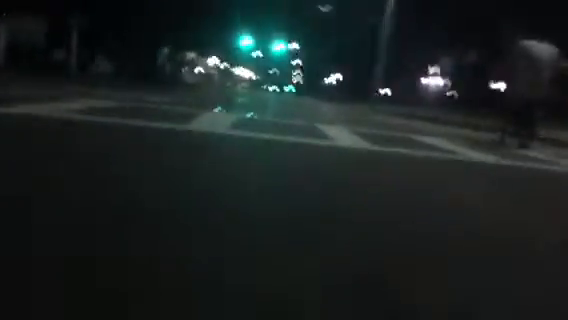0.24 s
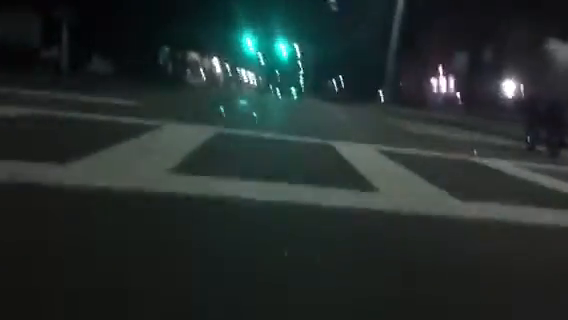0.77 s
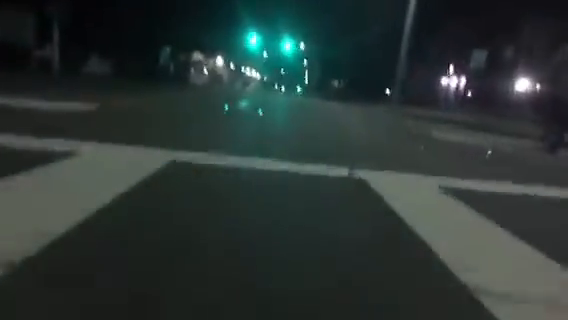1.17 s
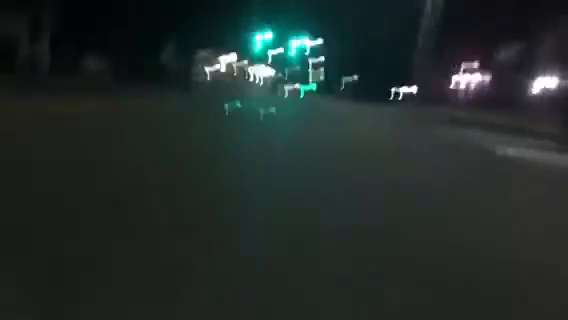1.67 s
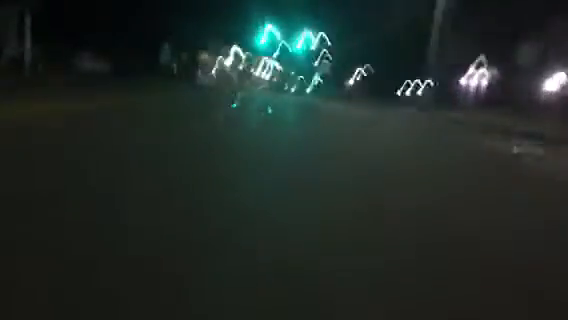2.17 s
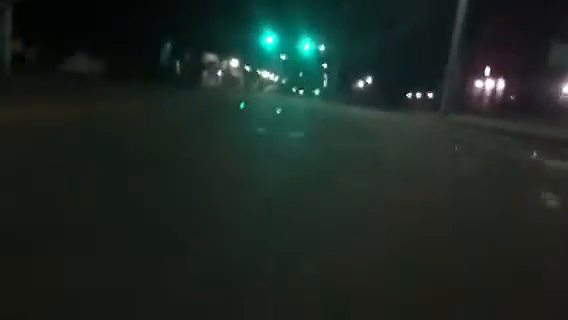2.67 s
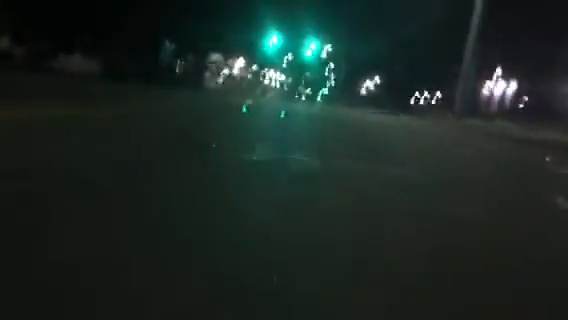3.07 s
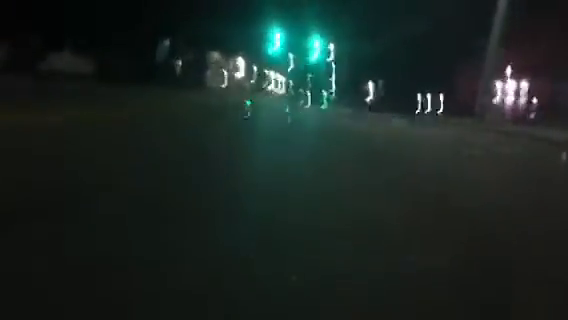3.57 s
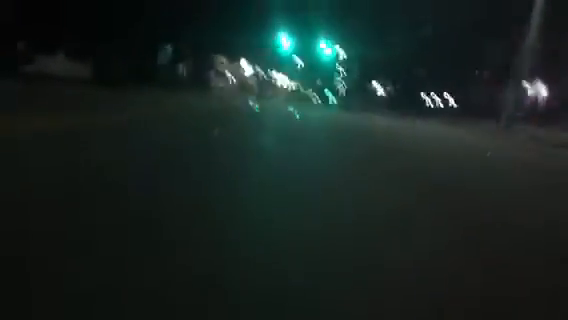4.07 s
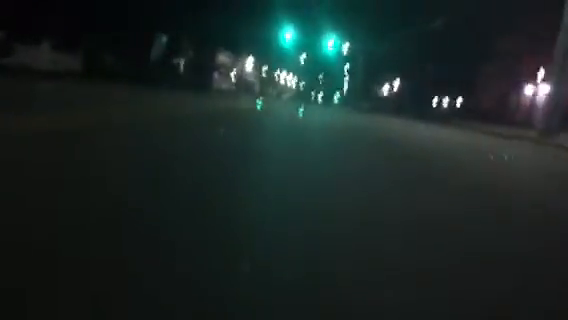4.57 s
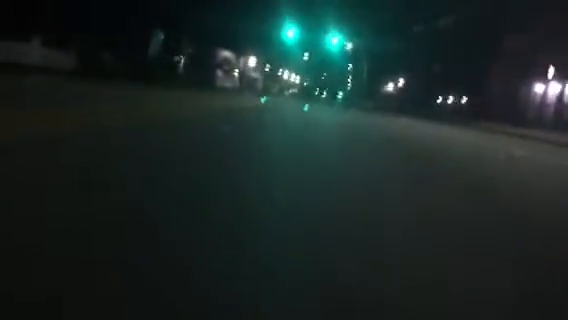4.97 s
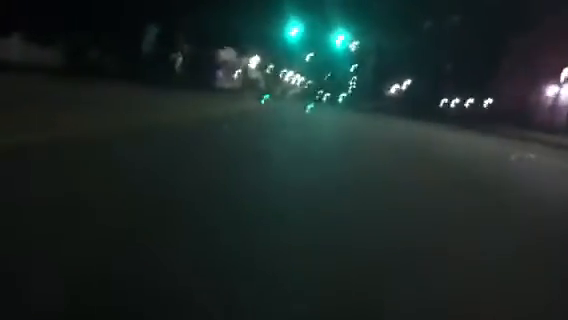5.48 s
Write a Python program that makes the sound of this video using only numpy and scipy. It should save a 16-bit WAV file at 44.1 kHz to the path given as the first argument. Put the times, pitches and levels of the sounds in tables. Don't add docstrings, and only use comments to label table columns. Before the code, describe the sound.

A powered wheelchair speeds along a night road, motor humming over low rumble while bumps thud and loose parts clack hard around two seconds.

```python
import sys
import numpy as np
from scipy import signal
from scipy.fft import rfft, irfft
from scipy.io import wavfile
from scipy.ndimage import uniform_filter1d

SR = 44100
rng = np.random.default_rng(int(sys.argv[2]) if len(sys.argv) > 2 else 0)


def undo_db(level):
    steps = np.asarray(level, float) / 20
    return 10 ** steps


def to_wav(sig):
    pcm = np.clip(np.atleast_2d(sig), -1, 1) * 32767
    pcm = np.round(pcm).astype(np.int16)
    wavfile.write(sys.argv[1], SR, pcm.T)


N = 253134

# time in seconds, level in dB against the average.
ROAD = [(0, -0.5), (.6, -1), (1.0, -2), (1.4, 2.5), (1.55, 2), (1.63, 4.5), (1.72, 5), (1.82, 1.5),
        (2.08, -5.5), (2.17, 6.5), (2.24, -0.5), (2.33, -8), (2.45, -6), (3.05, -4.5), (3.6, -1), (4.2, -1),
        (4.5, -1.5), (5.74, 0)]


def evened(x):
    return x / np.sqrt(np.mean(x ** 2) + 1e-20)


def peaked(x):
    return x / np.sqrt(uniform_filter1d(x ** 2, size=66).max())


def read(points, hz):
    f, value = np.transpose(points)
    return np.interp(np.log(hz + 1), np.log(f + 1), value)


def curve(rows, order):
    columns = np.transpose(rows)
    return np.interp(np.arange(N) / SR, columns[0], columns[order])


def add(mix, s, sound):
    part = mix[round(s * SR):][:len(sound)]
    part += sound[:len(part)]


def drift(hz):
    f = np.fft.rfftfreq(N, 1 / SR)
    return evened(irfft(rfft(rng.standard_normal(N)) / (1 + (f / hz) ** 2), N))


def causal(db):
    log_gain = np.log(undo_db(np.maximum(np.r_[db, db[-2:0:-1]], -100)))
    taps = np.fft.ifft(np.exp(np.conj(signal.hilbert(log_gain)))).real[:2048]
    return taps / np.linalg.norm(taps)


def coloured(x, points):
    response = causal(read(points, np.fft.rfftfreq(4096, 1 / SR)))
    return signal.oaconvolve(x, response)[:len(x)]


def modes(x, table):
    out = 0
    for hz, width, db in table:
        r = np.exp(-np.pi * width / SR)
        pole = r * np.exp(2j * np.pi * hz / SR)
        ring = signal.lfilter([(1 - r) ** 2], [1, -2 * pole, pole ** 2], x).real
        out = out + undo_db(db) * 2 * ring / np.sqrt(width)
    return out


def motor():
    # time in seconds, level in dB.
    hum_points = [(0, -25), (.95, -27.5), (1.15, -32), (1.5, -26.5), (2.2, -49), (2.4, -30.5), (3, -26.5),
                  (3.5, -26.5), (3.65, -32.5), (4.25, -27), (4.4, -26), (4.9, -21.5), (5.4, -23.5), (5.47, -34.5),
                  (5.56, -24), (5.74, -19)]
    hum_hz, mesh_ratio = 205.9, 5 / 3
    turns = np.cumsum(hum_hz * (1 + 0.004 * drift(hz=6.7))) / SR
    hum_level = np.sqrt(2) * undo_db(curve(hum_points, order=1) + 2.5 * drift(hz=21))
    hum = hum_level * np.sin(2 * np.pi * turns + 0.57 * drift(hz=14))
    mesh_level = undo_db(-2.5 + 1.5 * drift(hz=9.4))
    mesh = mesh_level * np.sin(2 * np.pi * mesh_ratio * turns + 0.27 * drift(hz=9.9))
    return hum, mesh


def frame_level():
    # centre in seconds, level in dB, half length in seconds.
    swell_rows = [(0.11, -22, 0.096), (0.5, -23, 0.22), (0.716, -21, 0.02), (0.834, -22.5, 0.015),
                  (1.122, -21, 0.24), (1.316, -20, 0.022), (1.485, -25.5, 0.039), (1.696, -28.5, 0.11),
                  (1.7, -35, 0.014), (1.857, -30, 0.57), (2.18, -11.5, 0.0068), (2.518, -25, 0.09),
                  (2.736, -24.5, 0.042), (2.807, -15.5, 0.017), (2.977, -21, 0.097), (3.158, -20.5, 0.031),
                  (3.238, -26, 0.094), (3.412, -18, 0.0057), (3.565, -20, 0.14), (3.782, -17.5, 0.014),
                  (3.915, -24, 0.18), (3.943, -24.5, 0.012), (4.355, -20.5, 0.2), (4.913, -20, 0.011),
                  (4.931, -25, 0.34), (5.149, -18, 0.027), (5.273, -22, 0.033), (5.384, -20.5, 0.027),
                  (5.605, -20, 0.025), (5.789, -21.5, 0.28)]
    t = np.arange(0, N, 64) / SR
    swells = sum(undo_db(db) * np.exp(-((t - s) / half) ** 2) for s, db, half in swell_rows)
    resting = undo_db(-30.5 + 0.47 * curve(ROAD, order=1))
    return resting + np.interp(np.arange(N) / SR, t, swells)


def frame_ringing(mesh):
    # pitch in Hz, width in Hz, level in dB.
    frame_modes = [(344.1, 13.9, 2.5), (371.64, 27.2, 0.5), (389.4, 41.4, -10)]
    ringing = mesh + evened(modes(rng.standard_normal(N), frame_modes))
    slow = np.sqrt(uniform_filter1d(ringing ** 2, size=4000) + 0.11)
    return frame_level() * evened(ringing / slow)


def shaking(bumps):
    return evened(uniform_filter1d(abs(bumps), size=2500))


def rumble(bumps):
    # frequency in Hz, density in dB per Hz.
    low_colour = [(8.8, -44), (15, -17.5), (48, 0.5), (155, -1.5), (199, -3), (225, -6.5), (272, -10.5),
                  (348, -15), (401, -5), (487, -28.5), (1000, -51), (1300, -79.5), (2200, -120)]
    hz = np.fft.rfftfreq(N, 1 / SR)
    lumpy = rng.standard_normal(N) * undo_db(2.0 * drift(hz=30))
    low = irfft(rfft(lumpy) * undo_db(read(low_colour, hz)), N)
    return undo_db(-24.5 + 0.91 * curve(ROAD, order=1) + 1.8 * shaking(bumps)) * evened(low)


def rattle(bumps):
    # pitch in Hz, width in Hz, level in dB.
    ridges = [(1640, 140, -10), (3660, 610, -3), (4540, 580, 1), (5840, 760, -11), (9450, 1200, -9.5)]
    # frequency in Hz, density in dB per Hz.
    housing = [(260, -29), (450, -8), (492, -9.5), (626, -9.5), (983, -25), (1250, -22), (1570, -22),
               (2210, -28.5), (4490, -39.5), (5060, -43.5), (5890, -37), (7710, -45.5), (9380, -45.5),
               (15200, -66.5), (16400, -77.5)]
    sound = rng.standard_normal(N) * undo_db(1.5 * drift(hz=40))
    grain = undo_db(-60 * np.arange(1200) / SR / .023)
    busy = .9 + .6 * evened(uniform_filter1d(abs(bumps), size=600))
    for hz in (700, 1500, 3300, 4500, 6000, 9000):
        strength = undo_db(5.7 * np.minimum(rng.exponential(1, N), 2.4))
        hits = strength * (rng.random(N) < 70 * busy / SR)
        grains = signal.oaconvolve(hits, grain)[:N] * rng.standard_normal(N)
        sound = sound + 0.92 * np.sqrt(hz / SR) * evened(modes(grains, [(hz, 0.7 * hz, 0)]))
    sound = sound + 0.22 * evened(modes(sound, ridges))
    level = undo_db(-44.5 + 0.66 * curve(ROAD, order=1) + shaking(bumps))
    return level * evened(coloured(sound, housing))


def jolt(hz, length, phase, tail):
    t = np.arange(SR // 5) / SR - .05
    shape = np.where(t < 0, np.exp(-(t / (.5 * length)) ** 2), 1 / np.cosh(t / (tail * length)))
    return shape * np.cos(2 * np.pi * (hz * t + phase))


def thuds():
    # deepest swing in seconds, peak in dB, pitch in Hz, length in seconds,
    # direction (1 kicked up, -1 dropped).
    large = [(0.143, -6, 151.3, 0.014, -1), (0.363, -5, 102.7, 0.014, -1), (0.495, -10.5, 106, 0.03, -1),
             (0.612, -6, 116, 0.022, -1), (0.729, -8.5, 88, 0.018, -1), (0.823, -10, 103.2, 0.015, 1),
             (0.845, -7.5, 108.4, 0.013, -1), (0.937, -12.5, 80.6, 0.05, -1), (1.299, -8.5, 117, 0.01, -1),
             (1.399, -7.5, 114.7, 0.01, 1), (1.525, -11, 86.5, 0.012, -1), (1.569, -4, 100.3, 0.017, 1),
             (1.63, -8, 130.3, 0.022, -1), (1.665, -4, 69.6, 0.022, 1), (1.71, -6, 100, 0.016, 1),
             (1.811, -1.5, 104.7, 0.018, 1), (2.015, -6.5, 99.6, 0.02, -1), (2.048, -5, 114.4, 0.011, -1),
             (2.151, -3.5, 94.6, 0.018, 1), (2.184, -5, 89.3, 0.016, 1), (2.408, -14, 55.2, 0.051, 1),
             (3.049, -6, 117, 0.012, -1), (3.623, -5.5, 87.7, 0.015, -1), (3.681, -7.5, 105, 0.014, -1),
             (3.712, -7, 125.7, 0.01, 1), (3.791, -4.5, 99.5, 0.014, 1), (3.873, -7, 83.7, 0.02, -1),
             (4.187, -3.5, 121.5, 0.013, 1), (4.269, -2.5, 111.3, 0.013, 1)]
    # time in seconds, peak in dB, direction.
    small = [(0.035, -18.5, -1), (0.217, -12, 1), (1.262, -11, 1), (1.439, -11.5, -1), (1.464, -11, -1),
             (1.734, -11.5, 1), (1.843, -15, -1), (2.275, -13, 1), (3.323, -13.5, -1), (3.406, -10, -1),
             (3.554, -12.5, -1), (4.024, -8.5, -1), (4.054, -12, -1), (4.225, -9.5, -1), (4.452, -11.5, -1),
             (4.923, -12.5, -1), (5.277, -13, 1), (5.387, -13.5, -1), (5.509, -12.5, 1)]
    # time in seconds, peak in dB, pitch
    # in Hz, direction.
    more_bumps = [(0.401, -13, 110.3, -1), (0.528, -15.5, 110.6, -1), (0.802, -10, 79.9, 1),
                  (0.951, -13.5, 100.7, -1), (1.1, -14.5, 111, 1), (1.32, -12, 99, 1), (1.558, -7, 110, 1),
                  (1.584, -8.5, 110.3, 1), (1.601, -6.5, 89.2, -1), (1.7, -11, 110, 1),
                  (1.756, -14.5, 100.2, -1), (1.802, -3.5, 94.6, -1), (2.004, -6, 94.4, -1),
                  (2.064, -10.5, 89.4, 1), (2.146, -9, 99.7, -1), (2.2, -10.5, 110.7, 1),
                  (2.39, -16.5, 80.6, 1), (3.285, -15, 110.2, -1), (3.768, -12.5, 100.2, -1),
                  (4.154, -14, 110.6, 1), (4.239, -10.5, 109.5, -1), (4.386, -12, 79.2, 1),
                  (4.619, -19, 80.4, 1), (4.816, -17, 100.8, -1), (5.04, -14.5, 100, -1),
                  (5.153, -14.5, 100, 1)]
    out = np.zeros(N)
    rows = large + [(s, db, 117, 0.011, way) for s, db, way in small]
    for (s, db, hz, length, way), (u, v) in zip(rows, rng.random((len(rows), 2))):
        swing = jolt(hz, length, 0.075 * (u - .5), tail=0.23)
        swing = swing + .5 * jolt(1.93 * hz, 0.49 * length, .2 * (v - .5), tail=0.52)
        cut = round(max(.05 - s, 0) * SR)
        add(out, max(s - .05, 0), np.sign(way) * undo_db(db - 2.5) * swing[cut:])
    for s, db, hz, way in more_bumps:
        add(out, s - .05, np.sign(way) * undo_db(db) * jolt(hz, 0.015, 0, tail=.3))
    return out


def ticks():
    # time in seconds, body in dB, bright part in dB, body pitch in Hz.
    clacks = [(0.4685, -40, -44, 1580), (0.59, -42, -44, 1640), (0.7947, -29, -52.5, 1270),
              (0.927, -42, -46, 1740), (1.3894, -33.5, -55, 1240), (1.493, -35, -39, 1550),
              (1.557, -31, -53, 1320), (1.5963, -43, -45, 1100), (1.607, -37, -40, 1156),
              (1.637, -43, -43, 3000), (1.6581, -25.5, -37, 1220), (1.67, -58, -36, 3710),
              (1.7868, -23.5, -40.5, 2150), (1.802, -31.5, -38, 1500), (1.9988, -38.5, -55, 1880),
              (2.055, -39.5, -46, 1530), (2.1416, -28, -35, 1500), (2.14, -28, -34, 1300),
              (2.148, -30, -24, 1680), (2.1645, -18, -43, 1300), (2.175, -24, -21.5, 1500),
              (2.18, -27.5, -25.5, 1563), (2.1869, -17.5, -21.5, 1660), (2.196, -16.5, -26, 1238),
              (2.254, -36, -50, 1700), (3.3922, -36.5, -45, 4070), (3.699, -37.5, -61, 1230),
              (4.231, -46, -44, 1590), (4.2505, -32.5, -45, 2100), (4.254, -39, -37, 3240)]
    # time in seconds, body in dB, bright part in dB, body pitch in Hz.
    scrapes = [(0.135, -43, -47, 1280), (0.198, -54, -45.5, 1560), (0.3589, -46.5, -58, 2150),
               (0.504, -45, -57, 1970), (0.6033, -41, -64, 1220), (0.784, -49, -46, 2860),
               (0.8244, -40.5, -54, 2010), (0.962, -41, -51.5, 1520), (1.3, -38.5, -58, 1860),
               (1.4718, -37.5, -41.5, 1890), (1.573, -42, -36, 2950), (1.6465, -41, -39, 2940),
               (1.6855, -57, -43, 1670), (1.707, -49, -42.5, 1250), (1.7614, -39.5, -51, 3880),
               (1.8506, -39.5, -41, 3800), (2.118, -30, -58, 1790), (2.209, -48, -46, 1100),
               (2.224, -39, -39, 1680), (2.6, -41, -42, 1620), (3.0364, -48, -68, 1360),
               (3.306, -40.5, -43.5, 1860), (3.619, -49, -51, 1450), (3.771, -32.5, -51, 1135),
               (3.86, -41, -50, 1220), (4.171, -40, -49, 1290), (4.255, -38, -39.5, 1720),
               (4.337, -43, -44.5, 1170), (4.602, -43.5, -48, 1710), (4.682, -44, -48.5, 1600)]
    # time in seconds, body in dB, body pitch in Hz.
    grit = [(0.1084, -38, 1290), (0.181, -37, 1470), (0.2457, -36, 1620), (0.559, -38, 1710),
            (0.7048, -40, 1570), (1.048, -41.5, 1700), (1.068, -42, 1300), (1.8935, -38, 1210),
            (1.94, -38, 1960), (1.9874, -40, 1370), (2.0827, -35, 1560), (2.3855, -41, 1200),
            (2.6579, -51, 1570), (2.6828, -46, 1620), (2.796, -38.5, 1420), (2.8373, -42, 1580),
            (3.1548, -36.5, 1250), (3.249, -37, 1230), (3.4046, -36, 1540), (4.1294, -44, 1200),
            (4.145, -38, 1500), (4.3044, -39, 1400), (4.4009, -40, 1620), (4.439, -44.5, 1600),
            (4.861, -36, 1215), (5.256, -35, 1220)]
    # frequency in Hz, density in dB per Hz.
    bright_colour = [(3000, -52), (4000, -17), (4900, -18), (6000, -17), (7200, -26.5), (8800, -24.5),
                     (10400, -35.5), (11800, -33.5), (14000, -47.5), (16400, -51.5)]
    out, t = np.zeros(N), np.arange(2000) / SR
    rows = [(*row, 0.00693) for row in clacks]
    rows += [(*row, 0.025) for row in scrapes]
    rows += [(s, db - 6, db - 15, hz, 0.012) for s, db, hz in grit]
    for (s, body_db, bright_db, hz, length), noise in zip(rows, rng.standard_normal((len(rows), len(t)))):
        u = t / np.clip(0.45 * (length - .007), .0001, .0045)
        contact = noise * (1 - np.exp(-5 * u)) * np.exp(-u)
        contact[3] += 2.5
        contact[3 + round(1.04 * SR / hz)] += 1.3 * .42
        contact += undo_db(-26) * noise[::-1] * np.exp(-t / .003)
        part_modes = [(hz, 0.43 * hz, 0), (1500, 900, -12), (min(1.9 * hz, 4400), 900, -8),
                      (2900, 1500, -13), (min(1.45 * hz, 4400), 800, -9)]
        body = undo_db(body_db + 1.5) * peaked(modes(contact, part_modes))
        bright = undo_db(bright_db - 2.0) * peaked(coloured(contact, bright_colour))
        add(out, s, body + bright)
    return signal.sosfilt(signal.butter(4, 1050, "highpass", fs=SR, output="sos"), out)


def knocks():
    # time in seconds, peak in dB, pitch in Hz.
    raps = [(0.139, -24, 490), (0.362, -27.5, 545), (0.503, -24, 524), (0.608, -22, 496), (0.796, -28, 510),
            (0.961, -30.5, 550), (1.313, -25, 540), (1.392, -21, 508), (1.478, -30, 545), (1.495, -29, 630),
            (1.565, -39, 490), (1.633, -37, 516), (1.658, -29, 567), (1.724, -34, 580), (1.8, -23.5, 615),
            (2.001, -27.5, 580), (2.147, -16, 565), (3.41, -28.5, 560), (3.633, -40, 540), (2.25, -22, 497),
            (2.459, -32.5, 580), (3.046, -31, 627), (3.541, -26, 570), (3.781, -20, 562), (3.871, -37, 540),
            (4.179, -23, 567), (4.254, -24, 536), (4.322, -30.5, 600), (4.843, -27, 514),
            (5.589, -26.5, 513)]
    out = np.zeros(N)
    for (s, db, hz), (u, v) in zip(raps, rng.random((len(raps), 2))):
        ring = jolt(hz, 0.0045, u, tail=0.65) + .5 * jolt(1.24 * hz, 0.0015, v, tail=.9)
        add(out, max(s - .05, 0), undo_db(db + 1.5) * ring)
    return out * undo_db(.3 * rng.standard_normal(3).mean())


def slams():
    # time in seconds, peak in dB, pitch in Hz, ring length in seconds.
    blows = [(2.1675, -13, 580, 0.0053), (2.1885, -11, 560, 0.0048), (2.178, -22, 800, .006),
             (2.169, -6, 270, .008), (2.179, -7, 230, .008), (2.166, -24, 1000, .004),
             (2.197, -16, 450, .006), (2.1905, -24, 900, .004), (1.805, -12, 230, .006),
             (1.66, -14, 300, .008), (2.251, -17, 380, .006), (3.78, -12, 270, .008), (.36, -13, 230, .006),
             (.61, -14, 240, .008), (1.566, -10, 230, .008), (2.006, -12, 220, .008),
             (2.05, -12, 220, .008), (.727, -17, 220, 0.0071)]
    out = np.zeros(N)
    for s, db, hz, length in blows:
        add(out, s - .05, undo_db(db) * jolt(hz, .004, 0, tail=length / .006))
    return out


def snaps():
    # pitch in Hz, width in Hz, level in dB.
    latch = [(1450, 450, -9), (2000, 620, 0.5), (3500, 1000, -8), (5350, 700, -22), (7800, 1200, -18),
             (9600, 1000, -20), (11300, 1000, -20.5), (13500, 2000, -24)]
    bracket = [(1250, 450, -13), (1580, 640, 1.5), (2150, 550, -7.5), (3080, 600, -6), (3560, 550, -14),
               (4380, 500, -21), (6030, 800, -13), (8240, 1100, -16.5)]
    pin = [(3200, 1200, -11.5), (6000, 1200, 1), (9200, 1200, -10), (12200, 2000, -6), (15000, 1500, -22)]
    # time in seconds, level in dB.
    latch_snaps = [
        (2.2499, -11.5),
        (2.1435, -28),
        (2.1735, -25),
    ]
    bracket_snaps = [(1.7864, -11), (2.1383, -14), (2.1333, -37), (2.1, -31), (1.4, -33), (.467, -27),
                     (.586, -30), (.932, -28), (4.229, -30), (2.6, -38), (2.1465, -22), (4.602, -36),
                     (1.301, -39), (3.868, -35), (.36, -36), (.5, -36)]
    pin_snaps = [
        (4.2617, -29.5),
        (4.2683, -28),
        (4.2705, -34),
        (1.8045, -32),
        (1.5965, -39),
        (1.6255, -38),
        (2.1835, -27),
        (2.179, -29),
        (1.6605, -37),
    ]
    out, t = np.zeros(N), np.arange(800) / SR
    parts = ((latch, latch_snaps, -1), (bracket, bracket_snaps, 1), (pin, pin_snaps, 1))
    for part, rows, other in parts:
        for s, db in rows:
            contact = undo_db(-27) * rng.standard_normal(len(t)) * np.exp(-t / .0025)
            contact[3] += 1
            if part is latch:
                contact = signal.lfilter(*signal.iirnotch(2850, 3.5, SR), contact)
            ring = modes(contact, part[::2]) + other * modes(contact, part[1::2])
            add(out, s, undo_db(db) * peaked(ring))
    return signal.sosfilt(signal.butter(4, 1100, "highpass", fs=SR, output="sos"), out)


def chatter():
    # centre in seconds, half length in seconds, level in dB.
    stretches = [
        (1.628, 0.044, -39.5),
        (1.814, 0.061, -65),
        (2.121, 0.042, -46),
        (2.189, 0.0093, -33),
        (4.259, 0.018, -53.5),
    ]
    # pitch in Hz, width in Hz, level in dB.
    loose_modes = [(1500, 1300, 9), (3340, 1300, 1.5), (6040, 1400, -5.5), (9370, 3000, -11)]
    t = np.arange(N) / SR
    level = sum(undo_db(db) * np.exp(-((t - s) / half) ** 2) for s, half, db in stretches)
    strength = undo_db(1.7 * np.minimum(rng.exponential(1, N), 3))
    hits = strength * (rng.random(N) < 380 / SR)
    grains = signal.oaconvolve(hits, undo_db(-60 * t[:800] / 0.02))[:N] * rng.standard_normal(N)
    return level * evened(modes(grains, loose_modes))


def scene():
    bumps = thuds()
    hum, mesh = motor()
    body = hum + frame_ringing(mesh) + rumble(bumps) + bumps + knocks() + slams()
    body = body / (1 + abs(body / .68) ** 4) ** .25
    return (body + ticks() + rattle(bumps) + chatter() + snaps())[None]


def top_cut(x):
    return signal.sosfilt(signal.butter(12, 16510, fs=SR, output="sos"), x)


def record(dry):
    heard = signal.sosfilt(signal.butter(2, 33, "highpass", fs=SR, output="sos"), dry)
    heard = heard + undo_db(-86.5) * rng.standard_normal(N)
    heard = signal.sosfilt(signal.cheby2(12, 50, 16300, fs=SR, output="sos"), heard)
    limited = heard / (1 + abs(heard / .74) ** 8) ** .125
    limited = limited * np.minimum((N - np.arange(N)) / 150, 1)
    return top_cut(limited)


dry = scene()
out = record(dry)
to_wav(out)
```